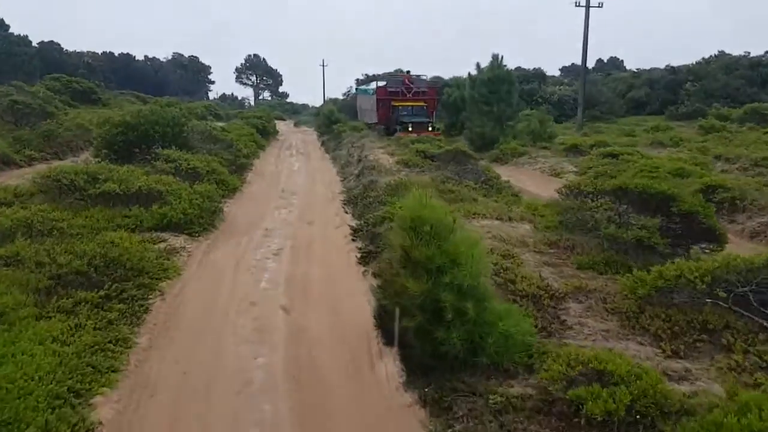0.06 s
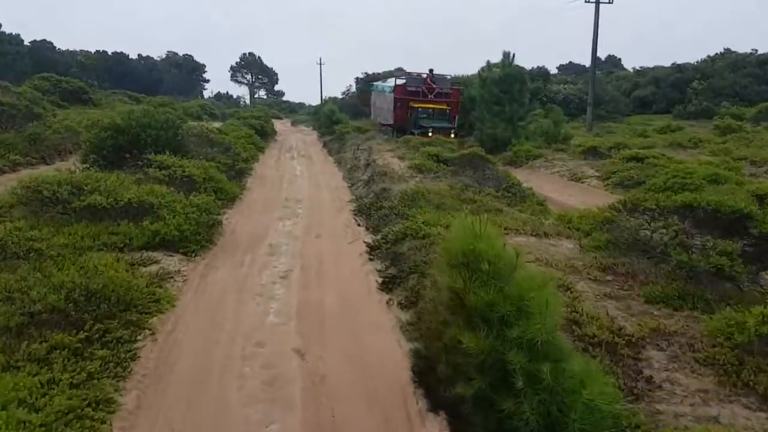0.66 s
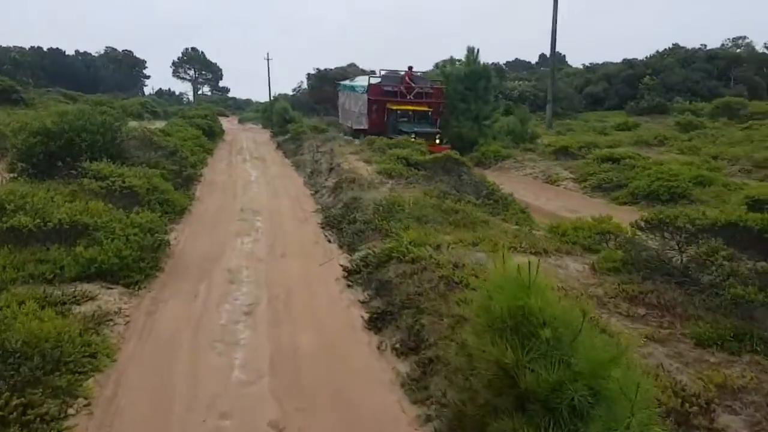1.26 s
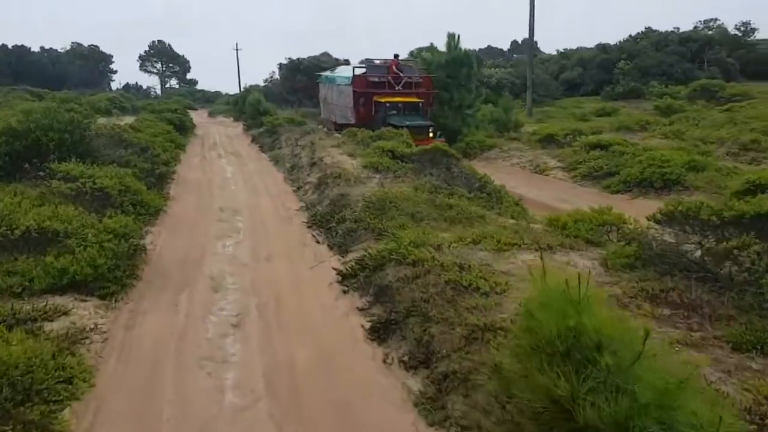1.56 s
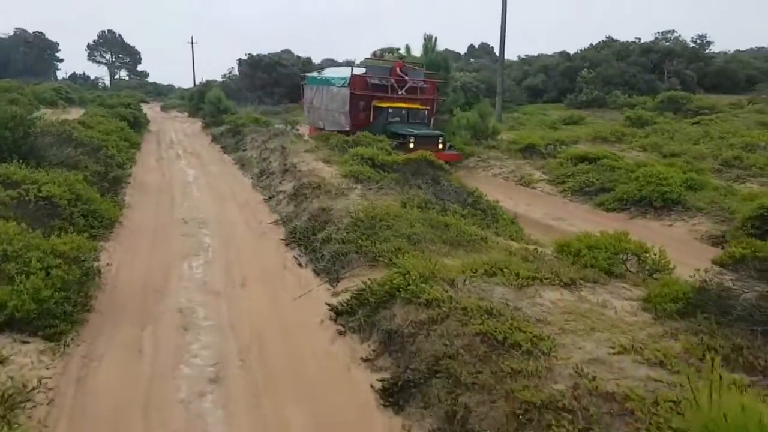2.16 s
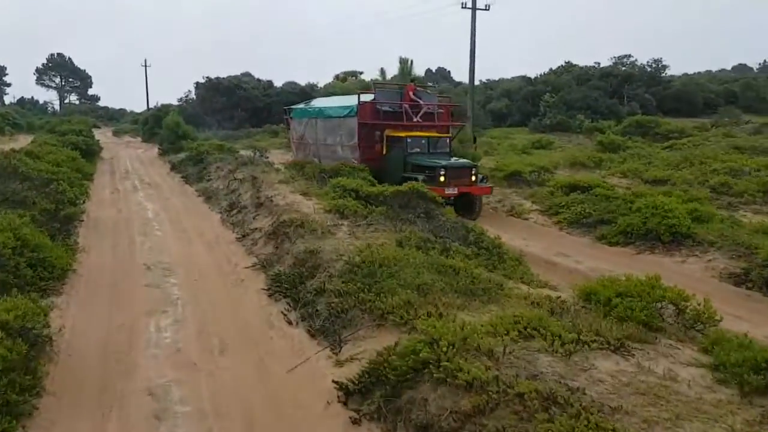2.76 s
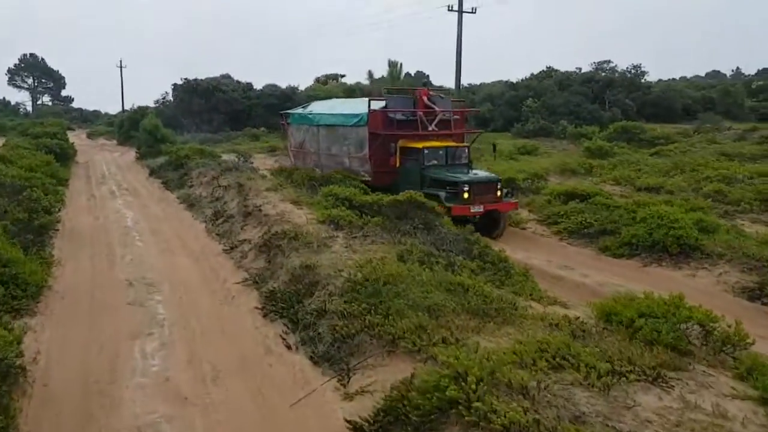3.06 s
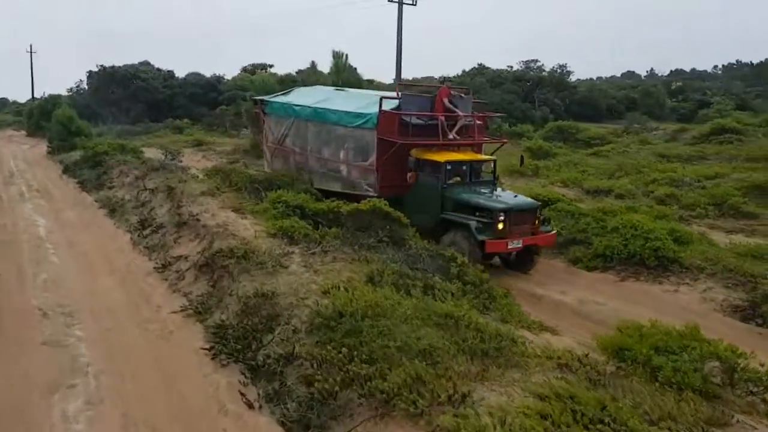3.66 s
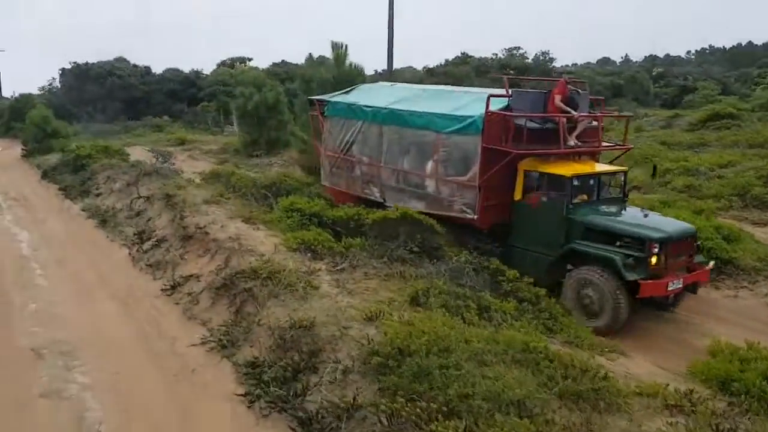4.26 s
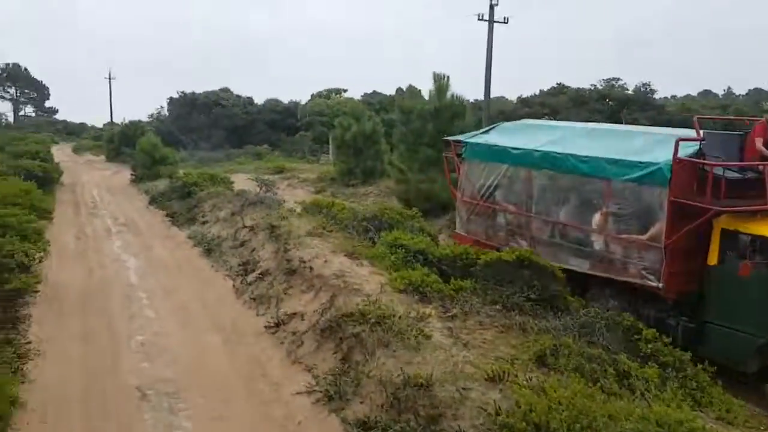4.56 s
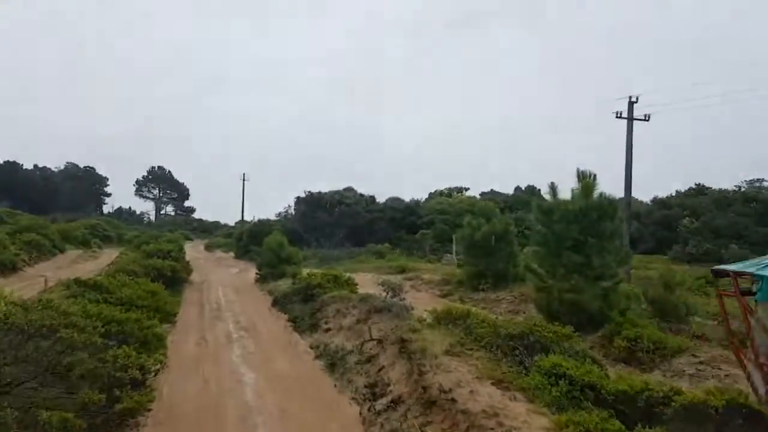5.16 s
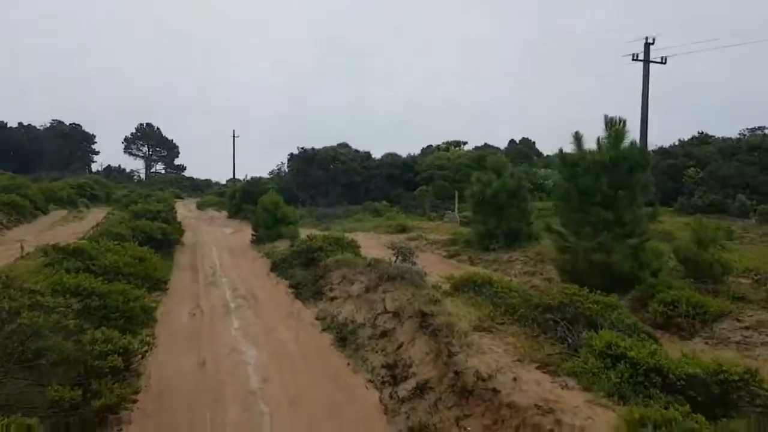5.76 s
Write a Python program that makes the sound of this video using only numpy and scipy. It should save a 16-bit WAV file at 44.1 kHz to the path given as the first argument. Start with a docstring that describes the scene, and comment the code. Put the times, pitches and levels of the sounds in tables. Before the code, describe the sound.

Wind buffets the microphone over the low drone of a truck driving on sand, with a passing truck's clatter and one loud knock.

```python
"""Off-road truck in the wind

A camera rides a truck on a sandy track: a six-cylinder exhaust drones over tyre hiss, gear whine
and ticking sand, and another truck clatters past. Wind buffets the left microphone port while a
finger covers the right. The finger slips off with a thump, the gain control ducks, and the wind
then hits both ports."""
import sys
import numpy as np
from scipy import signal
from scipy.fft import rfft, irfft, next_fast_len
from scipy.io import wavfile
from scipy.ndimage import uniform_filter1d, minimum_filter1d

SR = 44100
rng = np.random.default_rng(int(sys.argv[2]) if len(sys.argv) > 2 else 0)


def transcribe(u):
    """Save the signal u as a 16-bit wav file named by the first command-line argument.

    u: samples, shape (n,) or (channels, n), limited to [-1, 1]; the rate is SR.
    q: integer samples, one column per channel.
    """
    v = np.clip(np.atleast_2d(u).T, -1, 1)
    q = np.round(v * 32767).astype(np.int16)
    wavfile.write(sys.argv[1], SR, q)


N = 265244
T = np.arange(N) / SR
FFT_SIZE = next_fast_len(N, True)
FFT_HZ = np.fft.rfftfreq(FFT_SIZE, 1 / SR)


def amp(db):
    """Decibels to gain."""
    return 10 ** (np.asarray(db) / 20)


def unit(x):
    """Scales to rms 1."""
    return x / np.sqrt(np.mean(x ** 2) + 1e-20)


def evened(x, window_s):
    """Holds the running rms at 1, leaving only the quick grain."""
    power = abs(uniform_filter1d(x ** 2, int(window_s * SR) + 1))
    return unit(x / np.sqrt(power + 1e-9))


def curve(points):
    """Linear interpolation of (time [s], value) points."""
    return np.interp(T, *np.transpose(points))


def hump(at_s, half_s):
    """Gaussian envelope of height 1."""
    return np.exp(-((T - at_s) / half_s) ** 2)


def burst(at_s, db, rise_s, decay_s):
    """Exponential rise to a peak, then exponential decay."""
    return amp(db) * np.exp(np.minimum((T - at_s) / rise_s, (at_s - T) / decay_s))


def lag(x, tau_s):
    """One-pole low-pass."""
    pole = np.exp(-1 / (tau_s * SR))
    return signal.lfilter([1 - pole], [1, -pole], x)


def colour(x, spectrum):
    """Filters by (frequency [Hz], gain [dB]) points."""
    hz, db = np.transpose(spectrum)
    gain = amp(np.interp(np.log(FFT_HZ + 1), np.log(hz), db))
    return irfft(rfft(x, FFT_SIZE) * gain, FFT_SIZE)[:N]


def noise(spectrum):
    """Coloured noise of rms 1."""
    return unit(colour(rng.standard_normal(N), spectrum))


def wander(rate_hz):
    """Smooth random curve of rms 1."""
    white = rfft(rng.standard_normal(FFT_SIZE))
    return unit(irfft(white * np.exp(-(FFT_HZ / rate_hz) ** 2), FFT_SIZE)[:N])


def fuzzy_tone(hz, width_hz):
    """Noise band of rms 1 around a pitch."""
    envelope = wander(width_hz) + 1j * wander(width_hz)
    return unit((envelope * np.exp(2j * np.pi * hz * T)).real)


def wavering_notes(notes, waver, waver_hz):
    """Short sine notes sharing a random vibrato."""
    clock_s = np.cumsum(1 + waver * wander(waver_hz)) / SR
    return np.sqrt(2) * sum(amp(db) * hump(s, half_s) * np.sin(2 * np.pi * hz * clock_s)
                            for s, half_s, hz, db in notes)


# Body panel resonances: (frequency [Hz], width [Hz], added gain [dB])
PANEL_MODES = [(569, 52, 1.5), (843, 67, 2.5), (1460, 190, -10), (1940, 140, -14.5), (2530, 110, -19)]


def steel_body(x):
    """Steel panels add broad resonances."""
    f = np.fft.rfftfreq(N, 1 / SR)
    modes = sum(amp(db) / (1 + (2 * (f - hz) / width_hz) ** 2) for hz, width_hz, db in PANEL_MODES)
    return irfft(rfft(x) * (1 + modes), N)


# Rolling and hiss spectra: (frequency [Hz], density [dB])
ROLL_SPECTRUM = [(20, -10), (48, 19), (85, 25.5), (170, 27), (280, 20.5), (420, 13.5), (600, 8), (800, 5.5),
                 (1200, 7.5), (2000, 3), (3000, -1.5), (5000, -9), (8000, -18), (16000, -42)]
HISS_SPECTRUM = [(1500, -7), (4000, 5), (6500, 0), (8400, 2.5), (9800, -2), (11500, 2), (14000, -2),
                 (16000, -7.5)]
# Brief swells of the rolling noise: (time [s], half width [s], boost [dB])
ROLL_SWELLS = [(1.91, 0.29, 2.5), (5.905, .045, 3)]


def rolling(turns, bank_hz, roll_db, hiss_db, roll_db_per_hz=0.45, hiss_db_per_hz=-1.0):
    """Tyre, sand and engine noise follows engine speed and throbs with each firing."""
    offset_hz = bank_hz - bank_hz.mean()
    throb = 1 + 0.048 * np.cos(4 * np.pi * turns)
    flicker = amp(1.36 * wander(47))
    swell_db = sum(db * hump(s, half_s) for s, half_s, db in ROLL_SWELLS)
    roll = amp(roll_db + roll_db_per_hz * offset_hz + swell_db) * unit(steel_body(noise(ROLL_SPECTRUM)))
    hiss = amp(hiss_db + hiss_db_per_hz * offset_hz) * noise(HISS_SPECTRUM)
    return throb * flicker * (roll + hiss)


# Driveline tones: (frequency [Hz], width [Hz], left [dB], right [dB], share of load swell [0-1])
GEAR_TONES = [(591.4, 10, -48, -39, 0), (957, 21, -46, -44, 0.96), (1380, 30, -55, -49, .2),
              (1886, 18, -57, -51, .18), (2205, 20, -60, -53, .1)]
# Load swells: (time [s], half width [s], level [dB])
GEAR_LOADS = [(3.04, .38, -42.3), (4.366, 0.049, -34.5), (4.7, .15, -52)]


def gears():
    """Meshing gears whine at steady road speed and swell under load; stereo."""
    load = sum(amp(db) * hump(s, half_s) for s, half_s, db in GEAR_LOADS)
    return sum((amp([[left_db], [right_db]]) + share * load) * fuzzy_tone(hz, width_hz)
               for hz, width_hz, left_db, right_db, share in GEAR_TONES)


# Sprays of fine grains: (time [s], half width [s], relative level [dB])
SAND_SPRAYS = [(2.73, 0.25, -39.5), (3.2, 0.1, -41), (3.6, 2, -48.5)]
# Loudest grains: (time [s], relative level [dB], brightness [0-1])
SAND_HITS = [(2.3485, -32, 0.63), (2.686, -33.5, 0.29), (2.7168, -24.5, 0), (2.8114, -27, .8),
             (2.8787, -36, 0.8), (2.911, -21.5, 0.86), (2.9706, -31, 0.79), (3.2461, -30, .3),
             (3.4345, -31, 0.29), (3.4991, -23, .6), (3.5168, -30, .6), (3.5502, -22, 0.8),
             (3.5686, -29, .5), (3.6395, -27, 0.8), (3.654, -22, .8), (4.8401, -30, 0.8), (4.9469, -28, .6)]
# Bright glancing and dull square impacts: (frequency [Hz], density [dB])
GLANCING_SPECTRUM = [(1000, -40), (4000, -4), (7000, -1), (12500, 1), (16000, -1.5)]
SQUARE_HIT_SPECTRUM = [(1000, -30), (3500, -1), (5500, 1), (8000, -8), (16000, -16)]


def sand(grains_per_s=253, gain_db=-2, vary_db=3, decay_s=0.0013):
    """Grains strike the casing: dry ticks without a ring."""
    spray = sum(amp(db) * hump(s, half_s) for s, half_s, db in SAND_SPRAYS)
    grains = (rng.random(N) < grains_per_s / SR) * spray * amp(vary_db * rng.standard_normal(N))
    brightness = rng.random(N)
    for s, db, bright in SAND_HITS:
        i = round(s * SR)
        grains[i], brightness[i] = amp(db), bright
    glancing = lag(grains * np.sqrt(brightness) + 1e-18, decay_s) * noise(GLANCING_SPECTRUM)
    square = lag(grains * np.sqrt(1 - brightness) + 1e-18, decay_s) * noise(SQUARE_HIT_SPECTRUM)
    return amp(gain_db) * decay_s * SR * (glancing + square)


# Oncoming truck's clatter: (frequency [Hz], density [dB])
CLATTER_SPECTRUM = [(200, 0), (600, -1), (850, -5), (1300, 1.5), (2200, -2.5), (3500, -16.5), (8000, -20),
                    (16000, -31)]


def oncoming_truck(shield_db, level_db=-31, pass_s=4.54, closing_m_per_s=18, nearest_m=2.3):
    """Clatter rings in the panels and grows as it nears; once past, the body shields the engine."""
    along_m = closing_m_per_s * (T - pass_s)
    distance_m = np.hypot(nearest_m, along_m)
    behind = np.maximum(along_m, 0) / distance_m
    clatter = steel_body(steel_body(noise(CLATTER_SPECTRUM)))
    rattle = unit(clatter * amp(3.5 * wander(65)))
    return amp(level_db + shield_db * behind) * nearest_m / distance_m * rattle


# Sheet metal rings: (time [s], half width [s], frequency [Hz], level [dB])
PANEL_RINGS = [(4.343, 0.033, 1480, -43), (4.413, 0.025, 1200, -38), (4.437, .05, 1940, -48),
               (4.553, 0.027, 2170, -42)]


def loose_panels():
    """The other truck's loose panels ring briefly as it passes."""
    return wavering_notes(PANEL_RINGS, waver=0.0199, waver_hz=60.7)


# Exhaust harmonics: (order [x bank rate], relative level [dB])
EXHAUST_ORDERS = [(1, -15.5), (2, -0.5), (3, -10), (4, 1), (5, -12), (6, -14.5), (7, -24), (8, -22),
                  (9, -26.5), (10, -35), (11, -30.5), (12, -45), (13, -46)]


def exhaust(turns, note_db=-17, boom_db=-17.3, roughness=0.12, jitter_turns=0.012, pipe_lag_rad=0.53):
    """Firing pulses at order 2; unequal banks add odd orders, and the pipe delays the higher ones."""
    angle = 2 * np.pi * (turns + jitter_turns * wander(39))
    out = np.zeros(N)
    for order, db in EXHAUST_ORDERS:
        gain = amp(db + (note_db if order <= 2 else boom_db))
        flutter = 1 + roughness * np.sqrt(order / 2) * wander(30)
        out -= gain * flutter * np.cos(order * angle - pipe_lag_rad * max(order - 2, 0))
    return np.sqrt(2) * out


# Port tones: (time [s], half width [s], frequency [Hz], level [dB])
PORT_HOOTS = [(1.886, 0.013, 437, -17.5), (2.065, 0.015, 431, -14), (2.67, 0.07, 402.3, -27.5)]


def hoots():
    """Air blowing across the port sounds short, hollow notes."""
    return wavering_notes(PORT_HOOTS, waver=0.04, waver_hz=39)


# Strongest eddies: (time [s], relative level [dB], centre [Hz])
STRONG_EDDIES = [(.255, -7, 197), (1.479, -10.5, 349.4), (1.57, -15.5, 329.6), (1.68, -13.5, 334.6),
                 (1.715, -11, 150), (1.93, -16.5, 391.3), (2.15, -16.5, 324), (2.2, -15.5, 328),
                 (2.325, -7.5, 201.4), (2.375, -15, 389), (2.43, -14.5, 339), (2.77, -13, 270.4),
                 (2.951, -14, 250.6), (3.09, -15.5, 279.2), (3.51, -14, 281.9), (3.85, -13.5, 216),
                 (3.97, -15.5, 329.3), (4.11, -14, 250.1), (4.3, -14, 265), (4.35, -15, 249),
                 (4.7, -10, 246), (4.83, -10, 318.7)]


def eddies(half_s=0.014, spread=0.313, gain_db=-1.5, weak_per_s=3.1):
    """Short pressure swells of staggering pitch; weak ones come at random between the strong."""
    stagger = wander(254)
    weak_s = T[rng.random(N) < weak_per_s / SR]
    weak_db = -23 + 2 * np.interp(weak_s, T, wander(60))
    weak_hz = 310.1 * 2 ** (0.248 * np.interp(weak_s, T, wander(47.4)))
    out = np.zeros(N)
    for s, db, hz in [*STRONG_EDDIES, *zip(weak_s, weak_db, weak_hz)]:
        near = abs(T - s) < 4 * half_s
        swirl = np.sin(2 * np.pi * np.cumsum(hz * (1 + spread * stagger[near])) / SR)
        out[near] += amp(db + gain_db) * np.sqrt(2) * swirl * hump(s, half_s)[near]
    return out


# Vortex impacts: (time [s], level [dB], centre [Hz])
VORTEX_HITS = [(0.2785, -2.5, 790), (0.4305, -6, 750), (0.4905, -8, 700), (0.7406, -5, 861),
               (0.7569, -2, 790), (0.8881, -5, 560.4), (0.9565, -3, 700), (1.0499, -7, 481),
               (1.1335, -4, 700), (1.1483, -6, 610), (1.2202, -3, 563.6), (1.4585, -6, 700),
               (1.622, -6.5, 330), (1.7734, -13, 385.7), (2.349, -14, 620), (2.4336, -12, 400),
               (2.4934, -11.5, 447), (2.611, -14, 600), (2.9718, -18, 560), (3.088, -6.5, 451.6),
               (3.5848, -13, 561), (3.9831, -8.5, 376), (4.2907, -12, 560.4), (4.3873, -15, 430),
               (4.5797, -11, 490.4), (4.8035, -10, 861), (4.8856, -7, 470), (4.9335, -17, 620.4),
               (5.3844, -20, 468.6), (5.9247, -12, 660)]


def vortex_knocks(half_cycles=0.62):
    """A small vortex hits the port: one quick pressure swing, a dull knock."""
    return sum(amp(db) * np.sin(2 * np.pi * hz * (T - s)) * hump(s, half_cycles / hz)
               for s, db, hz in VORTEX_HITS)


# Sharp spurts of wind: (time [s], relative level [dB], decay [s])
WIND_SPURTS = [(0.01, -8, 0.028), (0.075, -8.5, 0.011), (0.12, -9.5, 0.02), (0.441, -11.5, 0.011),
               (0.6, -12.5, 0.025), (0.664, -11, 0.02), (0.73, -9, 0.022), (0.815, -30, 0.015),
               (0.895, -15, 0.014), (1.136, -17, 0.02), (1.34, -17, 0.022), (4.804, -12, 0.0037),
               (4.903, -11, 0.0023)]


def spurts(gain_db=-1, flutter_db=2):
    """Sudden tears in the airflow, brighter than the steady rasp."""
    air = noise([(150, -21), (450, 0.5), (850, 6.5), (1500, -3), (2400, -12.5), (3500, -33), (7000, -72)])
    envelope = sum(burst(s, db, 0.41 * decay_s, decay_s) for s, db, decay_s in WIND_SPURTS)
    return amp(gain_db) * envelope * unit(air * amp(flutter_db * wander(150)))


# Wind spectra: (frequency [Hz], density [dB])
BUFFET_SPECTRUM = [(20, -23), (50, -12.5), (100, 1), (170, 3.5), (240, -2.5), (330, -9), (480, -17.5),
                   (800, -27.5), (1600, -41.5), (4000, -80)]
RASP_SPECTRUM = [(100, -34), (280, 4), (480, 4), (750, 1), (1050, -6.5), (1500, -14), (2200, -24),
                 (3200, -43), (6000, -57), (16000, -82)]
# Gusts: (port, start [s], end [s], rise and fall [s], buffet [dB], relative rasp [dB])
WIND_GUSTS = [("left", 0, 1.47, 0.017, -14, -16.5), ("left", 0.56, 0.89, 0.03, -19, -18),
              ("left", 1.204, 1.277, 0.049, -36, -14.5), ("left", 2.06, 2.42, 0.076, -19, -31.5),
              ("left", 4.763, 5.0, 0.068, -18, -21), ("right", 5.115, 5.16, 0.011, -8.5, -26),
              ("left", 5.17, 5.4, 0.022, -15, -27), ("right", 5.35, 5.36, 0.015, -8, -21),
              ("left", 5.42, 5.8, 0.07, -17.5, -32), ("right", 5.835, 5.85, 0.017, -22, -22.5),
              ("left", 5.905, 5.94, 0.026, -19, -26), ("right", 5.97, 6.01, 0.022, -4, -23.5)]


def wind(port, turns, breeze_buffet_db=-19.5, breeze_rasp_db=-40.5, gust_rasp_gain_db=1.5):
    """Breeze and gusts on one port: low buffeting, and a rasp that flutters as the engine shakes."""
    buffet_gain, rasp_gain = amp(breeze_buffet_db), amp(breeze_rasp_db)
    for side, start_s, end_s, edge_s, buffet_db, rasp_db in WIND_GUSTS:
        if side == port:
            outside_s = np.maximum(np.maximum(start_s - T, T - end_s), 0)
            gust = np.exp(-outside_s / edge_s)
            buffet_gain = np.hypot(buffet_gain, amp(buffet_db) * gust)
            rasp_gain = np.hypot(rasp_gain, amp(rasp_db + gust_rasp_gain_db) * gust)
    buffet = unit(evened(noise(BUFFET_SPECTRUM), window_s=0.0296) * amp(1.32 * wander(25)))
    shake = 1 + 0.12 * np.cos(2 * np.pi * turns)
    flutter = amp(2.5 * wander(175)) * shake
    rasp = evened(colour(rng.standard_normal(N) * flutter, RASP_SPECTRUM), window_s=0.04)
    return buffet_gain * buffet + rasp_gain * rasp


# Transmission through the finger: (frequency [Hz], gain [dB])
FINGER_RESPONSE = [(30, -28), (140, -30.5), (260, -28), (500, -30), (1000, -32.5), (2000, -33), (4000, -30),
                   (8000, -35), (14000, -22)]
# Skin slips: (time [s], level [dB], centre [Hz])
FINGER_CREAKS = [(2.7, -50, 1500), (3.725, -52, 1002), (4.27, -39, 601)]


def covering_finger(outside, rumble_db=-56):
    """The finger muffles the port, creaks on the casing and adds a faint rumble."""
    creaks = sum(burst(s, db, rise_s=0.001, decay_s=0.005) * fuzzy_tone(hz, width_hz=hz)
                 for s, db, hz in FINGER_CREAKS)
    rumble = amp(rumble_db) * noise([(20, -7), (50, -2), (120, -10), (400, -38), (2000, -70)])
    return colour(outside, FINGER_RESPONSE) + creaks + rumble


def finger_crack(snag_s=5.0825, free_s=5.0935, ring_hz=950, ring_decay_s=0.00077):
    """The fingertip snags, snaps free and slides off with a hiss; the crack rings the casing."""
    snaps = sum(burst(s, db, rise_s=0.0009, decay_s=0.0015) for s, db in [(snag_s, -22), (free_s, -6.5)])
    crack = noise([(200, -4), (700, 1), (1500, -6), (2100, -20), (3300, -16), (4500, -23), (16000, -30)])
    slide = amp(-29) * hump(at_s=5.098, half_s=0.0088)
    hiss = noise([(500, 8), (3000, -2), (6000, -8), (16000, -1)])
    age_s = np.maximum(T - free_s, 0)
    ring = amp(-2) * np.sin(2 * np.pi * ring_hz * age_s) * np.exp(-age_s / ring_decay_s)
    return snaps * crack + slide * hiss - ring


def finger_thump(at_s=5.096, push_hz=60, push_db=-5, swing_hz=112, swing_db=12):
    """The port opens: a deep push and a short, heavy pressure swing."""
    t = T - at_s
    push = -np.cos(2 * np.pi * push_hz * t) * hump(at_s - 0.005, half_s=0.015)
    swing = -np.cos(2 * np.pi * swing_hz * t) * hump(at_s, half_s=0.0048)
    return amp(push_db) * push + amp(swing_db) * swing


# Engine speed, half the firing rate: (time [s], rate of one cylinder bank [Hz])
BANK_RATE = [(0.0, 33.12), (0.23, 37.1), (0.66, 33.54), (1.02, 35.54), (1.4, 33.41), (1.7, 35.27),
             (2.09, 34), (2.41, 35.48), (2.81, 33.39), (2.96, 34.06), (3.98, 33.46), (4.22, 35.095),
             (4.36, 33.85), (4.66, 32.93), (5.05, 34.13), (5.15, 32), (5.64, 33.26), (6.01, 32.95)]
# Opening swell of the whole mix: (time [s], gain [dB])
MIX_SWELL = [(0, -14), (.35, -13), (.7, -5), (1.25, -4), (1.55, 0)]


def scene(uncovered_s=5.085, opening_s=0.0057):
    """Both ports hear the trucks; each has its own wind, the right only once uncovered."""
    bank_hz = curve(BANK_RATE)
    turns = np.cumsum(bank_hz) / SR
    left, right = exhaust(turns) + gears()
    left += rolling(turns, bank_hz, roll_db=-26, hiss_db=-45) + oncoming_truck(shield_db=-5)
    left += wind("left", turns) + loose_panels() + eddies() + vortex_knocks() + spurts() + hoots()
    left += sand()
    right += rolling(turns, bank_hz, roll_db=-26.5, hiss_db=-49) + oncoming_truck(shield_db=-2)
    uncovered = np.clip((T - uncovered_s) / opening_s + 1, 0, 1)
    right = (1 - uncovered) * covering_finger(right) + uncovered * (right + wind("right", turns))
    right += finger_thump() + finger_crack()
    return amp(curve(MIX_SWELL)) * np.array([left, right])


def record(dry, threshold_db=-5.5, hold_s=0.57, recover_db_per_s=58, ceiling=0.86, cutoff_hz=15900):
    """Gain control ducks both ports, holds and recovers; soft clipping and a low-pass follow."""
    power_db = 10 * np.log10(lag((dry ** 2).max(0), tau_s=0.0088) + 1e-12)
    demand_db = 1.213 * np.maximum(power_db - threshold_db, 0)  # more than the excess
    hold = int(hold_s * SR) | 1
    held_db = -minimum_filter1d(-demand_db, hold, origin=hold // 2, mode="nearest")
    ramp_db = recover_db_per_s * T
    duck_db = np.maximum.accumulate(held_db + ramp_db) - ramp_db
    smoothed_db = 0.4 * lag(duck_db, tau_s=0.0048) + 0.6 * lag(duck_db, tau_s=0.071)
    ducked = dry / amp(smoothed_db)
    clipped = ducked / (1 + abs(ducked / ceiling) ** 5) ** (1 / 5)
    lowpass = signal.firwin(511, cutoff_hz, window=("kaiser", 9), fs=SR)
    return signal.oaconvolve(clipped, lowpass[None], "same")


dry = scene()
out = record(dry)
transcribe(out)
```